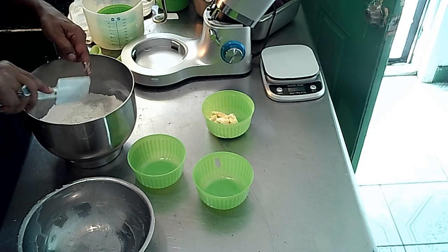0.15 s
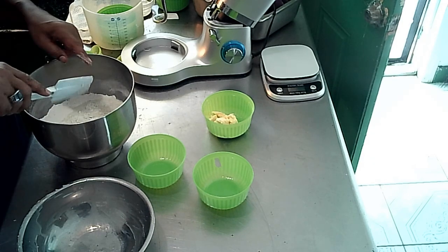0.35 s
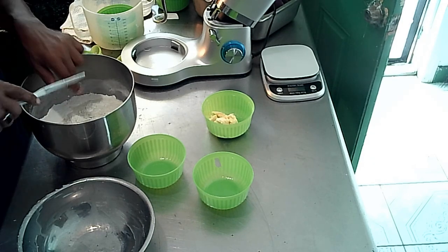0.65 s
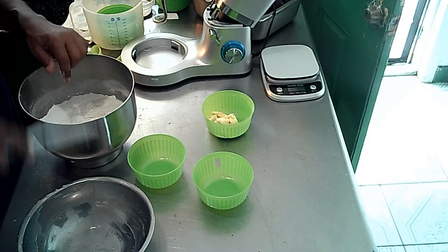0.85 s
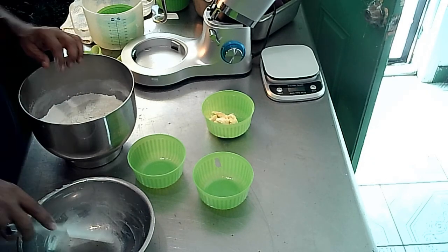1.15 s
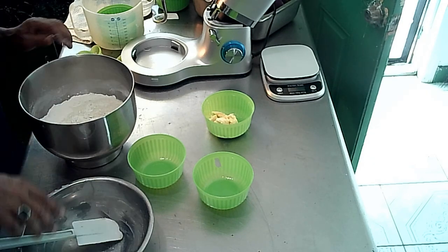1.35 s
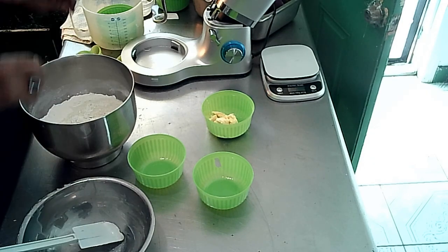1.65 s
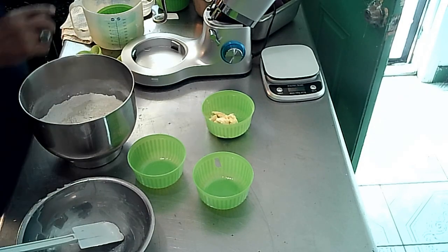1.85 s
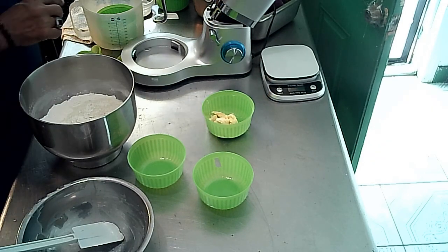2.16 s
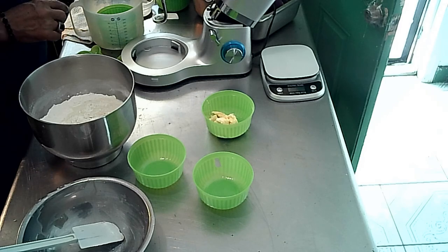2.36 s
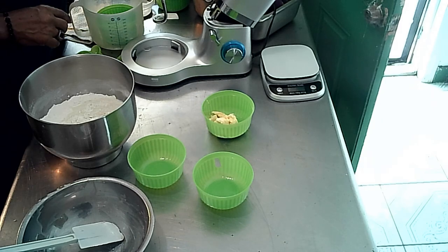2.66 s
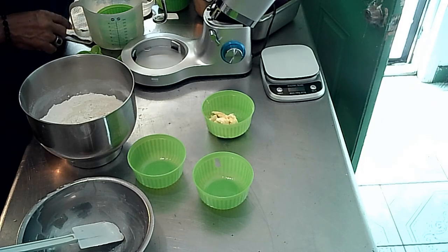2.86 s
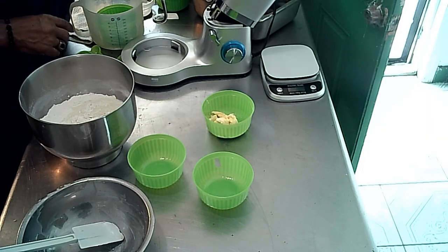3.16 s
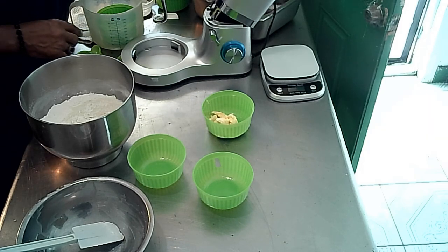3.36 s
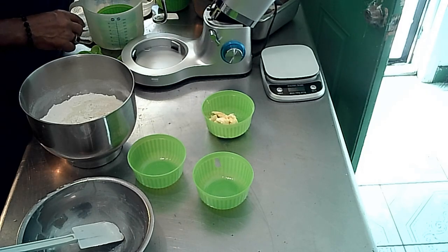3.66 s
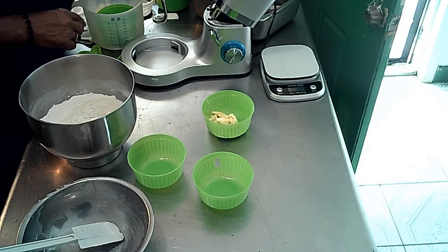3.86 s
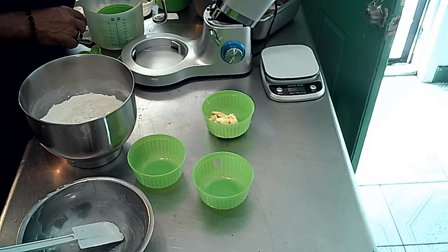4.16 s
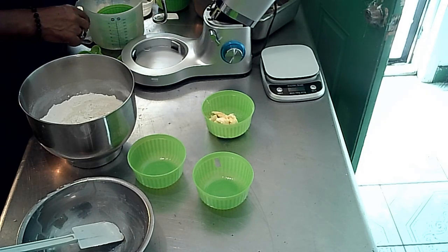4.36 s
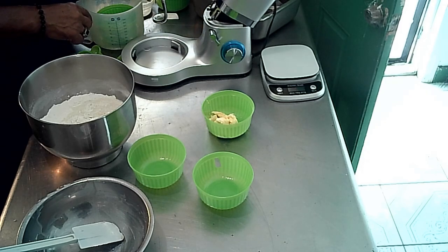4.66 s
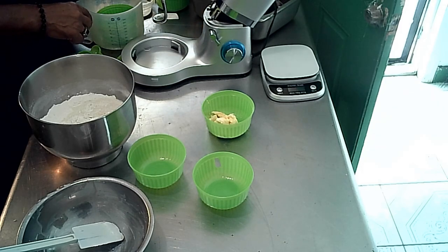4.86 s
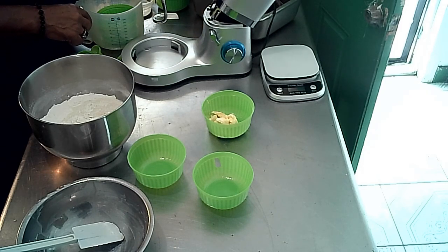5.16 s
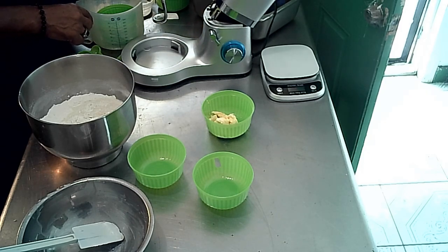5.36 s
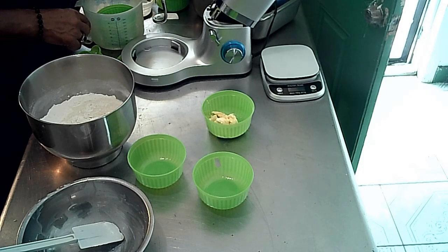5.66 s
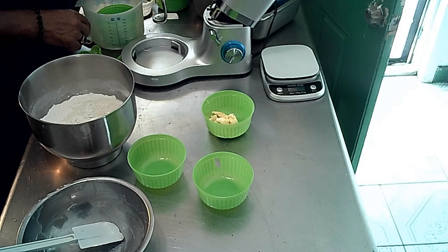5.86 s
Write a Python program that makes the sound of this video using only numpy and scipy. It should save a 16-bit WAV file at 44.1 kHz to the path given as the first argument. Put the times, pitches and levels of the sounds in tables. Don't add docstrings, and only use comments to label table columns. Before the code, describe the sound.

A spatula lands with a bright clink in an empty steel bowl, followed by distant plastic jug knocks and scrapes on a hissy, ticking kitchen background.

```python
import sys
import numpy as np
from scipy import signal
from scipy.fft import rfft, irfft
from scipy.io import wavfile
from scipy.ndimage import uniform_filter1d

SR = 44100
rng = np.random.default_rng(int(sys.argv[2]) if len(sys.argv) > 2 else 0)


def volts(x):
    e = np.asarray(x, float) / 20
    return 10 ** e


def store_pcm(level_fs):
    pcm = np.round(np.clip(level_fs, -1, 1) * 32767).astype(np.int16)
    wavfile.write(sys.argv[1], SR, np.atleast_2d(pcm).T)


N = 265437
TIME_S = np.arange(N) / SR


# (time [s], peak level [dB])
KNOCK_HITS = [
    (1.109, -29),
    (1.122, -69),
]
# (time [s], peak level [dB])
CLINK_HITS = [
    (1.231, -13.5),
    (1.243, -42),
]
# (frequency [Hz], level [dB], t60 [s])
BLADE_MODES = [(684, -14, .2), (1421, -4, .22), (1500, -5, .15), (1626, -4, .2), (1780, -6, .15),
               (1970, -3, .1), (2536, -17, .08), (3903, -4, .04), (4400, -7, .03), (5965, -8, .03),
               (7400, -14, .02)]
# (frequency [Hz], level [dB], t60 [s])
BOWL_MODES = [(296, -17, 1.3), (845, -19, .5), (1071, -14, .3), (1238, -13, .27), (1372, -11, .3),
              (1400, -2, .55), (1922, -9, .3), (2116, -13, .24), (2311, -1.5, .42), (3012, -22, .5),
              (3062, -13, .7), (3953, -4, .47), (4743, -7, .24), (4860, -8, .24)]
# (frequency [Hz], density [dB per Hz])
CLATTER_SPECTRUM = [(150, -19.5), (600, -26.5), (1100, -11), (1500, -13.5), (2200, -10), (2800, -20),
                    (3600, -10.5), (4300, -5.5), (5200, -10), (6200, -26), (7500, -22.5), (10000, -29.5),
                    (15500, -57)]


def spatula():
    wash = rms_one(coloured(CLATTER_SPECTRUM, N))
    low, knock_mid, top = band(wash, 180, 3050), band(wash, 1190, 2480), band(wash, 4000, 19600)
    clink_s, clink_db = CLINK_HITS[0]
    settle = volts(-60 * np.maximum(TIME_S - 1.41, 0) / 0.36)
    out = struck(KNOCK_HITS, BLADE_MODES, shift_db=-16)
    out += struck([(clink_s, -38)], BOWL_MODES, shift_db=-1) * settle
    out += ring(clink_s, 3960, clink_db - 5, t60=0.064)
    for s, peak_db in CLINK_HITS:
        out += low * dying(s, peak_db - 17, t60=0.35, rise_s=0.0026)
        out += top * dying(s, peak_db - 17, t60=0.26, rise_s=0.00047)
        out += top * dying(s, peak_db - 19, t60=0.019, rise_s=0.00022)
    for s, peak_db in KNOCK_HITS:
        out += knock_mid * dying(s, peak_db - 11, t60=0.19, rise_s=0.0013)
        out += top * dying(s, peak_db - 16, t60=0.028, rise_s=0.00034)
    return out


# (time [s], peak level [dB], low body level [dB], bright edge level [dB], t60 [s])
NUDGES = [(1.507, -61, 13, 1, 0.095), (1.894, -53.5, -16, -5, 0.2), (2, -49.5, -21, -5, 0.13),
          (2.695, -35, -3.5, -1.5, 0.18), (2.828, -47.5, 0, -1.5, 0.12), (2.897, -38.5, -14, -1.5, 0.16),
          (2.964, -32.5, -2, -2.5, 0.28), (3.008, -43.5, 9, -2.5, 0.37), (3.031, -36, -0.5, -10, 0.27),
          (3.202, -37, -14, -13, 0.085), (3.294, -42.5, -3, -6, 0.21), (3.372, -32.5, -4.5, -1, 0.2),
          (3.999, -43, -2.5, -4.5, 0.38), (4.415, -39.5, -3.5, -1, 0.24), (4.64, -45, -2, -3, 0.19),
          (5.179, -24.5, -13, -1, 0.16), (5.43, -44.5, -3, -3, 0.3), (5.861, -50, 3.5, -12.5, 0.25)]
# (start [s], rise [s], hold [s], level [dB], t60 of the fall [s])
JUG_DRAGS = [
    (3.002, 0.066, 0.011, -45.5, 0.27),
    (3.19, 0.0098, .003, -55.5, 0.34),
    (3.83, 0.083, 0.013, -62, 0.098),
    (3.959, 0.059, .003, -50.5, 0.44),
    (4.79, 0.037, .055, -44.5, 0.14),
    (5.828, 0.04, .003, -48, 0.43),
]
# (frequency [Hz], width [Hz], level [dB])
JUG_BODY = [(367, 300, -13.5), (564, 52, 14), (890, 160, -22), (1410, 193, 5.5), (1810, 330, -8.5),
            (2390, 338, 2.5), (2620, 290, -1.5), (3294, 580, 6), (3870, 543, 7), (4870, 690, 2.5),
            (5570, 510, 0), (8100, 300, -34)]
# (time [s], frequency [Hz], level [dB], t60 [s])
JUG_RINGS = [(0.73, 574, -51, 0.098), (.27, 538, -64, 0.22), (3.032, 368.5, -39, 0.15),
             (3.06, 826, -43, 0.15), (3.2, 1750, -49, .07), (3.2, 2780, -53, .07),
             (4.165, 977, -61.5, 0.59), (4.323, 980, -60, 0.16), (4.398, 1240, -62, .15),
             (4.415, 1527, -58, 0.17), (4.9, 5800, -49.5, 0.12), (5.181, 1970, -41, 0.069),
             (5.183, 2700, -52, .2), (5.185, 1410, -54, 0.38), (5.432, 1935, -54.5, 0.076),
             (5.439, 979, -58.5, 0.2), (5.465, 947, -61.5, 0.19), (5.858, 5550, -49, 0.069),
             (5.85, 389.4, -49, 0.2)]


def jug():
    clicks = grains(per_s=4000, spread_db=1.5)
    body = volts(-3.5) * band(clicks, 234, 4770)
    for k, (hz, width_hz, level_db) in enumerate(JUG_BODY):
        body += (-1) ** k * volts(level_db) * resonance(clicks, hz, width_hz)
    edges_hz = [(320, 624), (650, 1582), (1300, 2983), (3000, 15600)]
    low, wall, mid, top = [rms_one(band(body, *edge)) for edge in edges_hz]
    favoured = volts(-15.5) * rms_one(resonance(clicks, 886, width_hz=670))

    out = np.zeros(N)
    for s, peak_db, low_db, top_db, t60 in NUDGES:
        knocked = mid + volts(0.5 * low_db) * wall + volts(low_db) * low + favoured
        out += dying(s, peak_db - 11, t60, rise_s=0.0019) * knocked
        out += dying(s, peak_db - 9 + top_db, 0.67 * t60, rise_s=0.0019) * top

    rubbed = mid + volts(-4) * low + volts(-2) * wall + volts(-0.5) * top
    strokes = sum(stroke(*row) for row in JUG_DRAGS)
    out += strokes * volts(-1 + 3.07 * drift(57)) * rubbed
    rocking = volts(2.5 * np.tanh(drift(28)))
    return out + sum(ring(*row) for row in JUG_RINGS) * rocking


# (start [s], hiss level [dB])
BRUSH_STROKES = [
    (1.16, -67.5),
    (2.65, -77),
    (1.44, -82),
    (2.05, -77),
    (2.26, -69.5),
    (2.385, -73),
]


def brush():
    rubbing = rms_one(band(grains(per_s=9000, spread_db=4), 3400, 7300))
    strokes = sum(stroke(s, 0.023, 0.012, level_db, t60=0.22) for s, level_db in BRUSH_STROKES)
    return strokes * rubbing


def kitchen(x):
    t60_s, wall_cut_hz = 0.45, 5000
    t = np.arange(int(0.6 * SR)) / SR
    white = rng.standard_normal(len(t))
    dull = signal.sosfilt(signal.butter(1, wall_cut_hz, fs=SR, output="sos"), white)
    tail = dull * volts(-60 * t / t60_s) + (white - dull) * volts(-110 * t / t60_s)
    tail *= t > 0.004
    return signal.fftconvolve(x, tail / np.sqrt(np.sum(tail ** 2)))[:N]


# (frequency [Hz], density [dB per Hz])
AIR_SPECTRUM = [(30, -85), (60, -83), (140, -116), (260, -90), (450, -93), (700, -96.5), (1100, -100.5),
                (2000, -106), (5000, -116), (16000, -130)]


def murmur(handling):
    air = coloured(AIR_SPECTRUM, N)
    low, mid = band(air, 133, 440), band(air, 310, 1390)
    low_bumps = low * (volts(2.4 * drift(28)) - 1)
    mid_patches = mid * (volts(5.7 * np.tanh(0.86 * drift(21))) - 1)
    busy = uniform_filter1d(np.abs(handling), size=int(0.13 * SR))
    lift = np.sqrt(1 + volts(45) * 10 * busy)
    return (air + low_bumps + mid_patches) * volts(0.5) * lift


# (frequency [Hz], density [dB per Hz])
HISS_SPECTRUM = [(20, -85.5), (60, -92.5), (130, -116), (400, -101), (1000, -102), (2000, -104),
                 (4000, -106), (8000, -109), (13000, -112), (16000, -113)]
# (time [s], offset [full scale])
FLOATING_CHARGE = [(0.0, .088), (.6, .119), (1.2, .141), (1.5, .168), (1.82, .325), (2.22, .43),
                   (2.55, .34), (2.85, .19), (3.3, .055), (3.7, -.008), (4.25, -.068), (4.7, -.083),
                   (5.2, -.085), (5.75, -.097), (6.02, -.094)]


def inputs():
    shared, left, right = [coloured(HISS_SPECTRUM, N) for _ in range(3)]
    left_offset = 0.0637 + 0.0021 * (TIME_S > 3.85)
    right_offset = np.interp(TIME_S, *np.transpose(FLOATING_CHARGE))
    offsets = uniform_filter1d(np.array([left_offset, right_offset]), size=9000, axis=1, mode="nearest")
    charge = np.abs(offsets[1])
    speed = uniform_filter1d(np.abs(np.gradient(offsets[1])) * SR, size=20000)

    share = 0.67
    left = volts(-2) * (np.sqrt(share) * shared + np.sqrt(1 - share) * left)
    right = volts(6.5 * charge) * (np.sqrt(share) * shared + np.sqrt(1 - share) * right)

    steps = np.cumsum(grains(per_s=2900, spread_db=4.5))
    wander = rms_one(band(steps, 25, 99)) + volts(-8) * rms_one(band(steps, 217, 1570))
    wander *= volts(-67 + 19 * charge + 18.5 * speed)

    lumps = rms_one(band(rng.standard_normal((2, N)), 53, 264))
    lumps *= volts(-79.5 + 8.5 * drift(11.7))
    thick = volts(-2) * (TIME_S > 4.15) * band(coloured(HISS_SPECTRUM, N), 4800, 22000)
    return np.array([left, right + wander]) + offsets + lumps + thick


def pops():
    t = np.arange(int(0.03 * SR)) / SR
    shape = np.exp(-t / 0.00031) - np.exp(-t / 0.0003)
    undershoot = 0.082 * (1 - np.exp(-t / 0.0028)) * np.exp(-t / 0.0048)
    shape = shape / shape.max() - undershoot
    s = np.arange(0.2354, N / SR, 0.25002)
    sizes = volts(-36.5 - 1.6 * s + 4.5 * rng.standard_normal(len(s)))
    marks = np.zeros(N)
    marks[np.round((s - 0.0004) * SR).astype(int)] = -(-1) ** np.arange(len(s)) * sizes
    return np.convolve(marks, shape)[:N]


# (time [s], length [ms])
SUPPLY_DROPS = [
    (.12708, 0.17),
    (.1297, 0.23),
    (.13022, 0.2),
    (5.1888, 0.17),
]
# (start [s], length [ms], number)
SUPPLY_CHATTER = [
    (.1091, 3.7, 11),
    (.128, .7, 4),
    (.1306, .5, 3),
    (5.1891, 2.9, 4),
]


def dips():
    out = np.zeros(N)
    for s, ms, number in SUPPLY_CHATTER:
        place, depth = rng.random(number), rng.standard_normal(number)
        along = (np.arange(number) + 0.7 * place) / number
        at = np.round((s + ms / 1000 * along) * SR).astype(int)
        out[at] = out[at + 1] = -volts(-30.5 + 2.5 * depth)
    for s, ms in SUPPLY_DROPS:
        out[round(s * SR):round((s + ms / 1000) * SR)] = -volts(-25)
    rounded = np.convolve(out, [0.18, 0.64, 0.18], "same")
    return rounded * np.array([[0.68], [1]])


def struck(hits, modes, shift_db):
    out = np.zeros(N)
    for s, peak_db in hits:
        for hz, level_db, t60 in modes:
            out += ring(s, hz, peak_db + level_db + shift_db + rng.normal(0, 1), t60)
    return out


def ring(s, hz, level_db, t60):
    t = np.maximum(TIME_S - s, 0)
    on = (t > 0) & (t < 1.5 * t60)
    out = np.zeros(N)
    out[on] = volts(level_db - 60 * t[on] / t60) * np.sin(2 * np.pi * hz * t[on])
    return out


def dying(s, level_db, t60, rise_s):
    t = np.maximum(TIME_S - s, 0)
    return volts(np.maximum(level_db - 60 * t / t60, -200)) * (1 - np.exp(-t / rise_s))


def stroke(s, rise_s, hold_s, level_db, t60):
    corners = s + np.cumsum([-0.01, 0.01, rise_s + 0.00043, hold_s + 0.0009, t60 + 0.001])
    shape_db = np.interp(TIME_S, corners, [-60, -19.5, 0, 0, -60])
    return volts(level_db + shape_db) * (TIME_S > corners[0]) * (TIME_S < corners[-1])


def grains(per_s, spread_db):
    sizes = volts(spread_db * np.minimum(rng.exponential(1, N), 5)) * rng.choice([-1, 1], N)
    return rms_one(sizes * (rng.random(N) < per_s / SR))


def coloured(points, count):
    hz = np.maximum(np.arange(count // 2 + 1) * SR / count, 1)
    points_hz, points_db = np.transpose(points)
    gain = volts(np.interp(np.log(hz), np.log(points_hz), points_db)) * (hz > 8)
    return irfft(rfft(rng.standard_normal(count)) * gain, count) * np.sqrt(SR / 2)


def drift(rate_hz):
    r = np.exp(-80 * np.pi * rate_hz / SR)
    slow = signal.lfilter([1], [1, -2 * r, r * r], rng.standard_normal(N // 40 + 2002))[2000:]
    return np.interp(np.arange(N) / 40, np.arange(len(slow)), rms_one(slow))


def resonance(x, hz, width_hz):
    r = np.exp(-np.pi * width_hz / SR)
    poles = [1, -2 * r * np.cos(2 * np.pi * hz / SR), r * r]
    return signal.lfilter([(1 - r * r) / 2, 0, (r * r - 1) / 2], poles, x)


def band(x, lo_hz, hi_hz):
    return signal.sosfilt(signal.butter(2, [lo_hz, hi_hz], "band", fs=SR, output="sos"), x)


def rms_one(x):
    return x / np.sqrt(np.mean(x ** 2) + 1e-20)


def scene():
    near, far = spatula(), jug()
    echoes = kitchen(volts(-12.5) * near + volts(-6) * far)
    air = volts(7) * (near + far + brush() + echoes) + murmur(far)
    return np.array([air, volts(-59) * air])


def band_limit(x):
    return signal.sosfilt(signal.butter(12, 16370, fs=SR, output="sos"), x)


def record(dry):
    mix = dry + inputs() + dips() + pops() * np.array([[1], [-0.03]])
    return band_limit(mix)


dry = scene()
out = record(dry)
store_pcm(out)
```